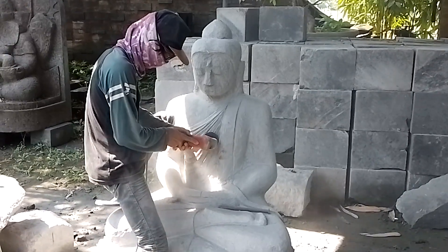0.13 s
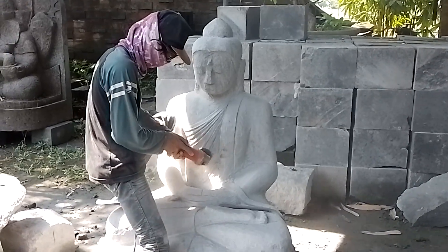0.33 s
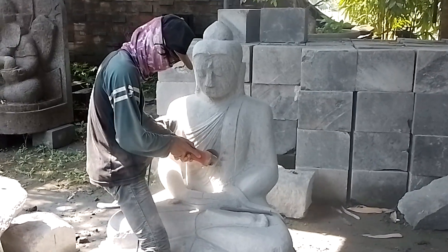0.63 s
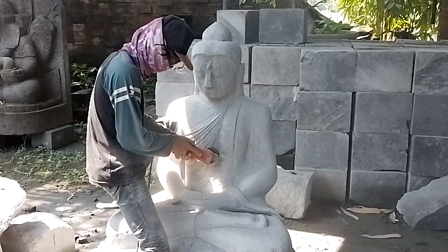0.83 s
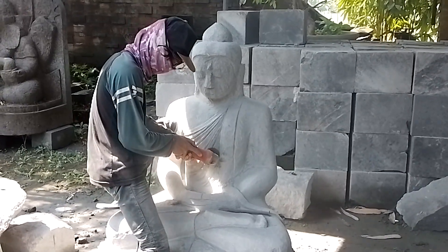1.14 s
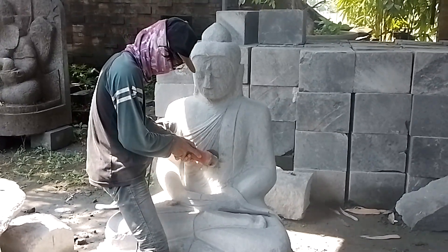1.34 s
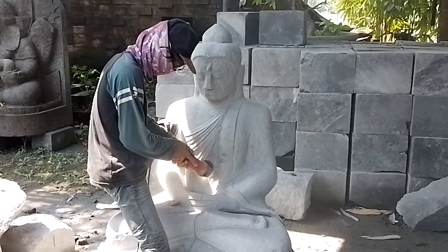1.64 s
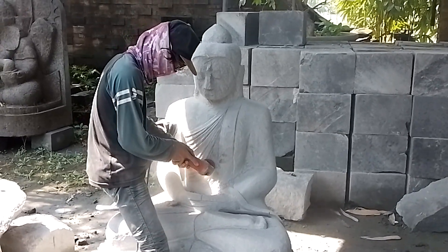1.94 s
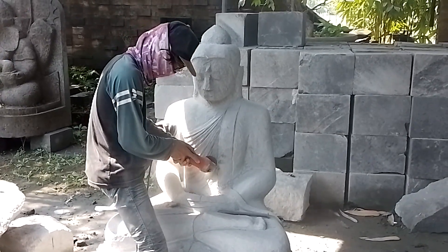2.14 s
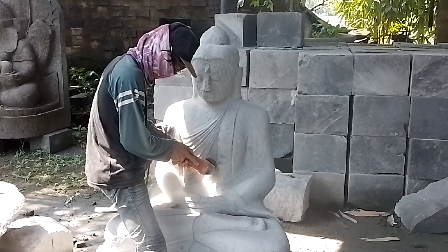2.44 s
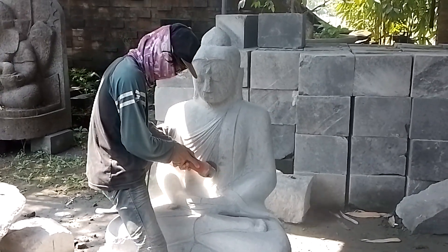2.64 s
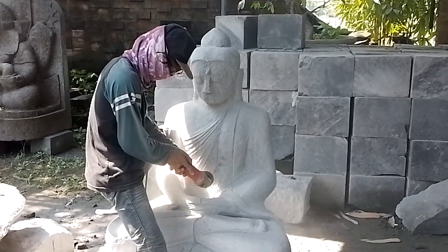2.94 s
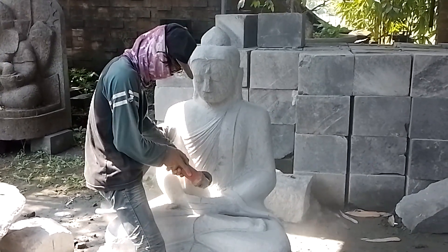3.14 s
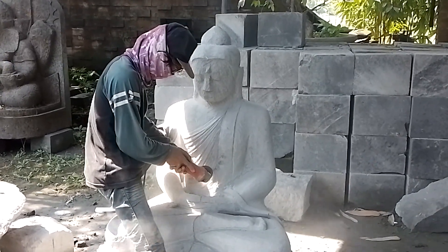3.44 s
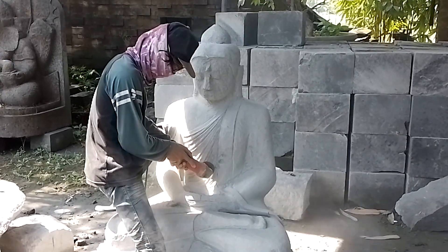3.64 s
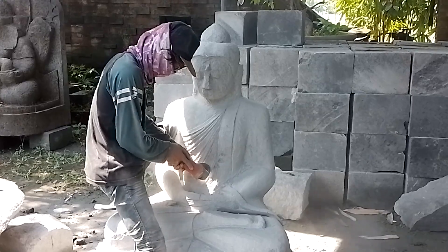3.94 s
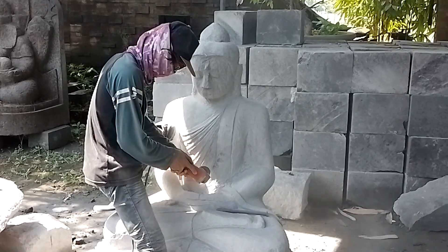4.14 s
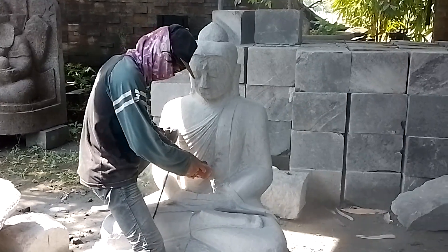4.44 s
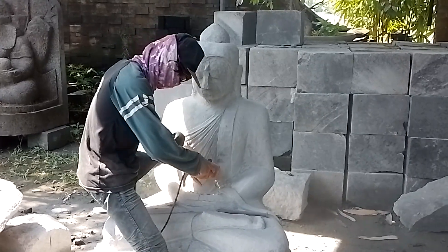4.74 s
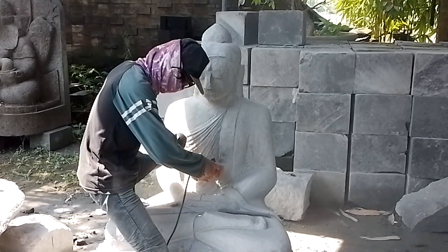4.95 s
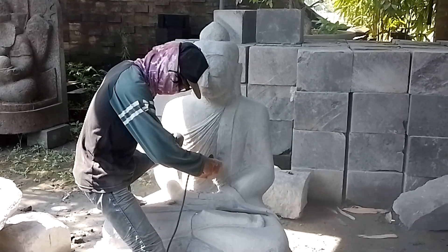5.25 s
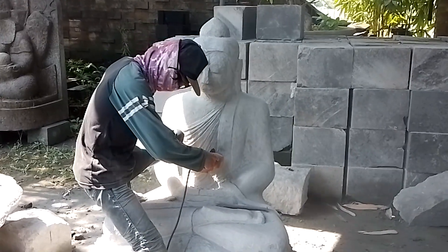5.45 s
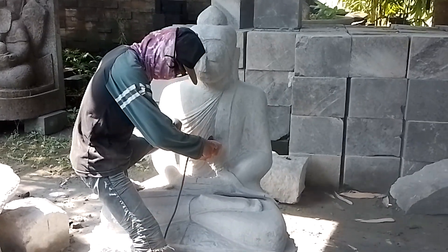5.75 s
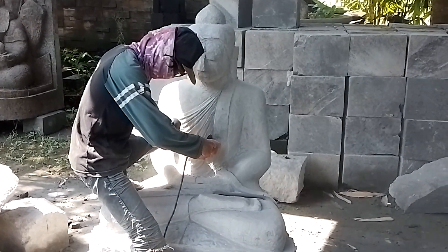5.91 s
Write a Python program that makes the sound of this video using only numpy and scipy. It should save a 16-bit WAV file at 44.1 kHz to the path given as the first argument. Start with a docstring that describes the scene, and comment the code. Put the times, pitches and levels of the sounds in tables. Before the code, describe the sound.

Close and bright, a power grinder works stone outdoors. Its thin gear whine and rushing air continue throughout, broken by two dense, metallic, rasping passes that drag the motor's pitch down. The whine recovers after each, then a long free run follows with an isolated knock, ending in quick faint taps and a light scrape. Short reflections and faint uneven low noise surround it.

```python
"""A brief scrape ends at once as an angle grinder leaves a stone statue; gear and motor whine climb back to speed.
Running free, it rushes with the cooling air and hiss of its disc, noise shaped by spectra that swell with load.
Pressed on again, dense noise strikes ring the disc's bright resonators, low noise rumbles as the stone, sharp
ticks roughen it, and drag slows the rotor through a first-order lag; sudden knocks crack brightly.
An open yard adds near echoes, and a faint, low, uneven noise lies beneath everything."""
import sys
import numpy as np
from scipy import signal
from scipy.fft import rfft, irfft
from scipy.io import wavfile
from scipy.ndimage import uniform_filter1d, minimum_filter1d

SR = 44100
rng = np.random.default_rng(int(sys.argv[2]) if len(sys.argv) > 2 else 0)


def generate_wav(sig):
    """Save sig (samples, or channels by samples) to the path in sys.argv[1] as 16-bit PCM at SR."""
    pcm = np.round(np.clip(np.atleast_2d(sig).T, -1, 1) * 32767).astype(np.int16)
    wavfile.write(sys.argv[1], SR, pcm)


N = 268128
TIME = np.arange(N) / SR   # s
HZ = np.maximum(np.arange(N // 2 + 1) * SR / N, 1)

# All table levels are relative: load, mixing and output gains follow.
# knocks of the disc on the stone: t/s, peak level/dB, rise/s, hold/s, decay/s, rumble level/dB,
# brightness/dB per octave
KNOCKS = [(0.8524, 9, 0.0003, .0015, 0.0035, -42, -3), (0.862, -8.5, .001, .004, .03, -45, -5),
          (2.1175, 3.5, 0.0005, .003, 0.013, -28, -2), (2.814, -10, 0.01, .008, 0.018, -27, 4),
          (3.703, 0.5, 0.003, .014, 0.009, -20, -4), (5.729, -3, 0.007, 0.003, 0.012, -45, 2),
          (5.807, -3, 0.004, .002, .014, -45, -1), (5.9, -11, .012, .003, .008, -45, 0),
          (5.92, -2.5, 0.001, 0.002, 0.003, -45, 1), (5.997, -8, .008, .003, .004, -45, -1),
          (6.013, -3, 0.002, 0.005, 0.012, -45, 3)]


def from_db(db):
    """Logarithmic level: 20 dB is a tenfold amplitude."""
    return 10 ** (np.asarray(db) / 20)


def lagged(x, lag_s):
    """First-order relaxation: the output approaches x with time constant lag_s."""
    r = np.exp(-1 / (lag_s * SR))
    return signal.lfilter([1 - r], [1, -r], x)


def in_time(rows):
    """Linear interpolation of each column of a curve at every sample."""
    t, *columns = np.transpose(rows)
    return np.array([np.interp(TIME, t, column) for column in columns])


def colour(rows):
    """Spectral envelope: each dB column, interpolated over log frequency, as gain."""
    f, *columns = np.transpose(rows)
    return from_db([np.interp(np.log(HZ), np.log(f), column) for column in columns])


def low_pass(hz, order):
    """Butterworth magnitude response: maximally flat below the cutoff."""
    return 1 / np.sqrt(1 + (HZ / hz) ** (2 * order))


def shape(white, gain):
    """Linear filtering by spectral product: for unit white noise, a gain of 1 gives 0 dB per Hz."""
    return irfft(rfft(white) * gain, N) * np.sqrt(SR / 2)


def drift(rate_hz):
    """Low-passed Gaussian fluctuation of unit spread, drawn at every eighth sample."""
    coarse = TIME[::8]
    spectrum = rfft(rng.standard_normal(len(coarse)))
    response = 1 / np.sqrt(1 + (HZ[:len(spectrum)] / rate_hz) ** 4)
    slow = irfft(spectrum * response, len(coarse))
    return np.interp(TIME, coarse, slow / slow.std())


def flutter(depth_db, rate_hz):
    """Random amplitude modulation: a log-normal gain of mean power 1."""
    gain = from_db(depth_db * drift(rate_hz))
    return gain / np.sqrt(np.mean(gain ** 2))


def stereo_noise(closeness):
    """Interchannel coherence: mid and side white noise mix to a correlation that varies with frequency."""
    # likeness of the two channels: f/Hz, correlation before scaling by closeness
    likeness_curve = [(60, 0.99), (700, 1), (1200, 0.56), (2400, 0.8), (3600, 0.022), (7000, 0.15),
                      (14000, 0.13)]
    f, alike = np.transpose(likeness_curve)
    alike = np.clip(closeness * np.interp(np.log(HZ), np.log(f), alike), -1, 1)
    mid, side = rfft(rng.standard_normal((2, N)))
    mid = np.sqrt((1 + alike) / 2) * mid
    side = np.sqrt((1 - alike) / 2) * side
    return irfft(mid + side * [[1], [-1]], N)


def contact():
    """Contact mechanics: passes and knocks set the disc's bite, its brightness, the rumble's strength and drag."""
    # the disc is laid on the stone, leaned on and lifted: start t/s, end t/s, lean-in/s, release/s,
    # bite level/dB, rumble level/dB, brightness/dB per octave, drag on the rotor/turns per s
    passes = [(0, 0.049, .005, 0.01, -6, -22.5, 0.5, 1.1), (0.892, 1.489, .22, .024, 4, -1.5, -2, 42),
              (2.139, 2.759, .08, .019, 4, 1, 0.6, 118), (5.852, 6.08, .2, 0.017, -13, -50, 0.5, 14)]
    touch_share = 0.63   # bite on first touch, as a share of the full bite
    idle_ring_db = -22   # the spinning disc rings faintly even in the air
    ring_tail_db, ring_tail_s = -12, 0.051   # the ringing lingers in the yard after a contact
    rumble_rise_s = 0.21   # longest time the low rumble takes to swell

    touches, shaking, drag = [], 0, 0
    for start, end, lean_s, release_s, bite_db, rumble_db, tilt_db, drag_hz in passes:
        touching = (TIME >= start) * np.exp(-np.maximum(TIME - end, 0) / release_s)
        pressure = touching * np.clip((TIME - start) / lean_s, 0, 1)
        strength = from_db(bite_db) * (touch_share * touching + (1 - touch_share) * pressure)
        touches.append((strength, tilt_db))
        swell = np.clip((TIME - start) / min(lean_s, rumble_rise_s), 0, 1)
        shaking = shaking + from_db(rumble_db) * touching * swell
        drag = drag + drag_hz * pressure
    for t, peak_db, rise_s, hold_s, decay_s, rumble_db, tilt_db in KNOCKS:
        rise = (np.minimum(TIME - t, 0) / rise_s) ** 2
        decay = np.maximum(TIME - t - hold_s, 0) / decay_s
        blow = np.exp(-rise - decay)
        touches.append((from_db(peak_db) * blow, tilt_db))
        shaking = shaking + from_db(rumble_db) * blow
    bite = from_db(idle_ring_db) + sum(strength for strength, _ in touches)
    edge_db = sum(strength * tilt_db for strength, tilt_db in touches) / bite
    bite = bite + from_db(ring_tail_db) * lagged(bite, ring_tail_s)
    return bite, edge_db, shaking, drag


def grinding(bite, edge_db, lightness, shared, ring_db, bend_hz):
    """Modal resonance: a dense uneven stream of grit strikes crushes stone and excites every mode of the disc."""
    # crushed stone: f/Hz, level/dB per Hz
    crunch = [(900, -69), (1500, -63.5), (2000, -66.5), (3200, -70), (5200, -66), (7200, -56), (9200, -55),
              (11000, -71), (12600, -77), (14000, -76)]
    # modes of the disc, some sharp and some in broad clusters: f/Hz, width/Hz, left level/dB per Hz,
    # right level/dB per Hz, change under a light touch/dB
    disc_modes = [(4546, 410, -54.5, -63, -7), (5000, 200, -54.5, -66, -7), (5300, 70, -48, -53.5, -9),
                  (5490, 170, -51.5, -57, -6), (5670, 200, -50, -58, -5), (5890, 100, -53, -62, -4),
                  (6300, 60, -41, -53, -3), (6395, 60, -44, -56, -2), (6480, 200, -44, -53, -4),
                  (6935, 70, -39, -52, 0), (7090, 130, -44, -51, 7), (7240, 160, -46, -58, 0),
                  (7430, 190, -40, -50, -2), (7700, 280, -44, -56, -2), (8340, 230, -43, -48, -3),
                  (8680, 100, -44, -47.5, -4), (9030, 70, -56, -57, -2), (9570, 200, -51, -49.5, 1),
                  (10250, 300, -58, -53, 0), (10725, 210, -50, -38.5, 0), (11170, 450, -57, -48, -1),
                  (11720, 200, -55, -47, -2), (11855, 90, -44.5, -38.5, -1), (11925, 90, -44, -37.5, -3),
                  (12200, 250, -57, -55, 0), (12965, 170, -56, -51, 3), (13770, 120, -60, -58, 0)]
    judder_db, light_judder_db = .9, .7   # the disc judders on the stone, more under a light touch

    judder = flutter(judder_db + light_judder_db * lightness, rate_hz=56)
    force = bite * judder * flutter(depth_db=1.5, rate_hz=1100)
    # a light touch mostly rings the disc; it takes pressure to crush stone
    crushing = force * np.minimum(bite, 1) * (1 - .5 * lightness)
    out = shape(crushing * stereo_noise(closeness=0.74), colour(crunch) * (1 - low_pass(780, order=3)))
    for hz, width_hz, left_db, right_db, light_db in disc_modes:
        r = np.exp(-np.pi * width_hz / SR)
        pole = r * np.exp(2j * np.pi * hz / SR)
        # "shared" is the share of strike power that both sides hear alike
        common, separate = rng.standard_normal(N), rng.standard_normal((2, N))
        grit = np.sqrt(shared) * common + np.sqrt(1 - shared) * separate
        # the contact point wanders over the disc: it favours one mode, then another, and bends each pitch
        mode_db = ring_db + light_db * lightness + edge_db * np.log2(hz / 8000)
        strikes = force * grit * flutter(depth_db=2, rate_hz=20) * from_db(mode_db)
        bend = np.exp(2j * np.pi * np.cumsum(bend_hz * drift(7.03)) / SR)
        resonance = signal.lfilter([(1 - r) ** 2], [1, -2 * pole, pole ** 2], strikes)
        ring = 2 * np.real(bend * resonance)
        out += from_db([[left_db], [right_db]]) * np.sqrt(SR / 2) * ring
    return out


def stone(shaking):
    """Amplitude-modulated noise: the stone's low rumble swells under the disc and fades afterwards."""
    # rumble of the stone: f/Hz, level/dB per Hz
    stone_spectrum = [(30, -105), (70, -75), (105, -75.5), (160, -84), (220, -69.5), (300, -57), (600, -60),
                      (1100, -58), (1400, -63.5), (1520, -51), (1700, -61), (3000, -54.5)]
    tail_db, tail_s = -20, 0.16   # slow fade of the low rumble
    rumble = stereo_noise(closeness=0.1) * flutter(depth_db=1.8, rate_hz=20)
    strength = shaking + from_db(tail_db) * lagged(shaking, tail_s)
    return shape(strength * rumble, colour(stone_spectrum)[0])


def bright_noise(bursts):
    """Band-limited noise: a bright band, as strong as the bursts."""
    band = signal.butter(3, [4500, 13000], "band", fs=SR, output="sos")
    return signal.sosfilt(band, bursts * stereo_noise(closeness=1.0)) * from_db(4)


def crackle(shaking):
    """Random impulse process: sparse random sharp ticks roughen the pressed noise."""
    rate_per_s, level_db, decay_s = 120, -11.5, .0004
    tick_db = 3 * np.minimum(rng.exponential(1, N), 3)
    ticks = from_db(tick_db) * (rng.random(N) < rate_per_s / SR)
    bursts = signal.lfilter([1], [1, -np.exp(-1 / (decay_s * SR))], ticks + 1e-18)
    return from_db(level_db) * shaking * bright_noise(bursts)


def rotor_speed(drag):
    """Rotational inertia: the rotor sags under drag and climbs back; gives turns per s and labour (0-1)."""
    # speed of the rotor with no load, which wanders a little: t/s, speed/turns per s
    free_speed = [(0, 586), (.5, 587.7), (1.8, 587.8), (2.85, 587.5), (3.1, 590.4), (3.5, 590.2),
                  (4.2, 588.2), (4.5, 588.9), (4.8, 588.6), (5.4, 591.9), (6.08, 591)]
    start_sag_hz, inertia_s = 36.9, .434   # speed lost at the outset; time to follow the load
    full_labour_sag_hz = 23.3   # this far below free speed, the motor pulls with all its strength
    sag = start_sag_hz * np.exp(-TIME / inertia_s) + lagged(drag, inertia_s)
    return in_time(free_speed)[0] - sag, np.clip(sag / full_labour_sag_hz, 0, 1)


def tones(partials, hz, waver_db, jitter_hz, rasp_db):
    """Harmonics and resonance: partials of a turning part stand out as they sweep through housing modes."""
    # resonances of the housing: f/Hz, half width/Hz, lift/dB
    housing = [(2800, 65, 8), (3095, 35, 4), (4400, 130, 3), (4715, 40, 2), (6330, 150, 7)]
    phase = 2 * np.pi * np.cumsum(hz + jitter_hz * drift(87)) / SR
    rasp = flutter(rasp_db, rate_hz=45)
    out = []
    for multiple, left_db, right_db in partials:
        multiple = round(multiple)
        start = rng.uniform(0, 2 * np.pi) + np.array([[0], [np.pi / 4]])
        housing_db = sum(lift_db / (1 + ((multiple * hz - centre) / half) ** 2)
                         for centre, half, lift_db in housing)
        level_db = housing_db + np.array([[left_db], [right_db]])
        gain = from_db(level_db) * flutter(waver_db, rate_hz=1.5)
        out.append(gain * rasp * np.sin(multiple * phase + start))
    return out


def motor(speed, labour, turn, bite):
    """Rotating-machine tones: hum, fan and gear whine track the rotor; labour lifts the whine, contact damps all."""
    # hum at the rotor's own speed: multiple of the speed, left level/dB, right level/dB
    hum_partials = [(1, -62.5, -64.5)]
    # level of the hum: t/s, level/dB
    hum_level = [(0, 2.5), (1.7, 8), (2.0, -1), (3.5, -1.5), (3.85, 0.5), (4.6, 2.5), (5.2, -2.5),
                 (6.08, 3)]
    # tone of the cooling fan: multiple of the speed, left level/dB, right level/dB
    fan_partials = [(4, -54, -53)]
    # gear whine, main tone first: harmonic of the gear tone, left level/dB, right level/dB
    whine_partials = [(2, -50, -35), (3, -33, -44), (4, -38, -46), (5, -42, -52)]
    # level of the whine, which dips and then sings out as the grip changes: t/s, level/dB
    whine_level = [(0, 0), (4.0, 0), (4.22, -8), (4.52, 4), (4.9, 0), (6.08, -3)]
    gear_ratio = 2.704   # gear tone as a multiple of the rotor speed
    main_db, main_labour_db = 3, 1.5   # main whine: lift at free speed, further rise when the motor labours
    fan_turn_db = 5   # the fan comes forward as the tool turns

    hum, = tones(hum_partials, speed, waver_db=1.2, jitter_hz=2.0, rasp_db=0)
    fan, = tones(fan_partials, speed, waver_db=1.5, jitter_hz=1.5, rasp_db=2)
    uneven_hz = 1.4 + 4 * labour   # the gear teeth run unevenly, more so under strain
    main, *overtones = tones(whine_partials, gear_ratio * speed, waver_db=1.1, jitter_hz=uneven_hz, rasp_db=2.4)
    whine = from_db(main_db + main_labour_db * labour) * main + sum(overtones)
    hum = from_db(in_time(hum_level)) * hum
    fan = from_db(fan_turn_db * turn) * fan
    whine = from_db(in_time(whine_level)) * whine
    return (hum + fan + whine) / (1 + bite)


def free_running(load, labour, turn, crossover_hz):
    """Turbulent flow: air from the fan vents below, hiss of the dusty disc above; both swell with load."""
    # cooling fan: f/Hz, level with vents facing/dB per Hz, level with vents turned away/dB per Hz
    fan_spectra = [(141, -115, -112), (333, -86, -87.5), (530, -92.5, -94), (664, -93.5, -86),
                   (946, -69.5, -80), (1095, -71, -98), (1186, -74.5, -66), (1335, -59.5, -69.5),
                   (1430, -60.5, -65), (2090, -65, -59), (2488, -57, -54.5), (2520, -64.5, -63),
                   (3350, -54.5, -58)]
    # hiss of the spinning disc: f/Hz, left level/dB per Hz, right level/dB per Hz
    hiss_spectra = [(3400, -67, -60), (4400, -60, -65), (5200, -59, -78), (6000, -57, -70),
                    (6500, -55, -65), (7300, -48, -63), (8400, -57, -60), (9300, -60, -60),
                    (10400, -68, -55), (11100, -63, -49), (11600, -63, -55), (12100, -62, -58),
                    (13100, -70, -63), (14200, -71, -65)]
    air_db = 0.18 + 6.5 * load
    hiss_db = 0.95 + 6.5 * load - 0.44 * labour   # it falls a little while the disc turns slowly

    below = low_pass(crossover_hz, order=12)
    air = stereo_noise(closeness=1.0) * flutter(depth_db=0.95, rate_hz=13)
    facing, away = (shape(air, gain * below) for gain in colour(fan_spectra))
    dust = stereo_noise(closeness=0.11) * flutter(depth_db=0.8, rate_hz=530)
    hiss = shape(dust, colour(hiss_spectra) * np.sqrt(1 - below ** 2))
    return from_db(air_db) * ((1 - turn) * facing + turn * away) + from_db(hiss_db) * hiss


def vents(labour, hz, width_hz):
    """Cavity resonance: air blowing through the housing gives a hollow tone, most while the motor labours."""
    hollow_db, labour_db = -81, 16.5   # starting level per Hz; rise when the motor labours
    fade_db_per_s = 1.96   # it fades as the tool works down the statue
    cavity = 1 / (1 + ((HZ - hz) / width_hz) ** 2) ** 2.44
    level_db = hollow_db + labour_db * labour - fade_db_per_s * TIME
    return from_db(level_db) * shape(stereo_noise(closeness=1.0), cavity)


def low_noise():
    """Modulated low-frequency noise: a faint, low, uneven noise beneath everything."""
    # low noise: f/Hz, level/dB per Hz
    low_spectrum = [(25, -97), (60, -103), (105, -95), (150, -114), (300, -130)]
    unevenness = flutter(depth_db=7, rate_hz=7)
    return shape(stereo_noise(closeness=0.87) * unevenness, colour(low_spectrum)[0])


def cracks():
    """Impulsive fracture: a sudden knock chips the stone with a short bright crack; a slow one hardly does."""
    crack_db, crack_s = -18, .004   # level relative to the knock's peak; decay
    burst = 0
    for t, peak_db, rise_s, *_ in KNOCKS:
        suddenness = min(1, .0013 / rise_s)
        decay = (TIME >= t) * np.exp(-np.abs(TIME - t) / crack_s)
        burst = burst + from_db(crack_db + peak_db) * suddenness * decay
    return bright_noise(burst)


def yard(x, sway_s):
    """Specular reflection: a few near echoes whose path lengths change slowly as the tool moves."""
    # echoes from the ground, the statue's base and the block wall: left delay/s, right delay/s, level/dB
    echoes = [(.0043, .0047, -17), (.0091, .0082, -15), (.0164, .0181, -14)]
    out = x.copy()
    for left_s, right_s, level_db in echoes:
        sway = sway_s * drift(0.76)
        echo = [np.interp(TIME - delay_s - sway, TIME, channel, left=0)
                for delay_s, channel in zip((left_s, right_s), x)]
        out += from_db(level_db) * np.array(echo)
    return out


def scene():
    """Superposition: tool, contact, yard and low noise add; the sound reaches the right side one sample early."""
    # the tool's air vents turn away as the grip changes: t/s, share turned away (0-1)
    turning = [(0, 0.2), (.6, 0.57), (1.65, 0.1), (2.9, 0), (4.0, 0.43), (4.6, 0.86), (5.8, 1),
               (6.08, 0.65)]
    heavy_drag_hz = 118   # drag of a heavy pass, turns per s
    firm_drag_hz, settle_s = 45.4, .08   # drag of a firm contact; time its ringing takes to follow

    bite, edge_db, shaking, drag = contact()
    speed, labour = rotor_speed(drag)
    turn = np.clip(in_time(turning)[0], 0, 1)
    lightness = np.clip(1 - lagged(drag, settle_s) / firm_drag_hz, 0, 1)
    ringing = grinding(bite, edge_db, lightness, shared=0.25, ring_db=3.5, bend_hz=12)
    pressed = from_db(3.0) * (ringing + stone(shaking) + cracks() + crackle(shaking))
    tool = free_running(drag / heavy_drag_hz, labour, turn, crossover_hz=2710)
    tool = tool + vents(labour, hz=889, width_hz=205)
    outdoors = from_db(-1.5) * yard(tool + pressed, sway_s=.00005)
    left, right = outdoors + motor(speed, labour, turn, bite) + low_noise()
    return np.array([np.roll(left, 1), right])


def gain_control(x, threshold_db, slope, release_db_per_s, attack_s):
    """Dynamic range compression: loud passages are turned down, and the gain recovers at a steady dB rate."""
    level_db = 10 * np.log10(uniform_filter1d(np.mean(x ** 2, axis=0), size=256) + 1e-12)
    excess_db = np.maximum(level_db - threshold_db, 0) * slope
    release_db = release_db_per_s * TIME
    held_db = np.maximum.accumulate(excess_db + release_db) - release_db
    return x * from_db(-lagged(held_db, attack_s))


def limiter(x, ceiling):
    """Peak limiting: a smoothed gain ducks for a few milliseconds around each peak above the ceiling."""
    allowed = ceiling / np.maximum(np.abs(x), ceiling)
    return x * uniform_filter1d(minimum_filter1d(allowed, size=64), size=48)


def record(dry):
    """Level control and band limiting: compression, a peak limiter, then a steep cut of the top."""
    held = gain_control(dry, threshold_db=-13.5, slope=0.56, release_db_per_s=72, attack_s=0.0061)
    return irfft(rfft(limiter(held, ceiling=0.92)) * low_pass(14330, order=400), N)


dry = scene()
out = record(dry)
generate_wav(out)
```